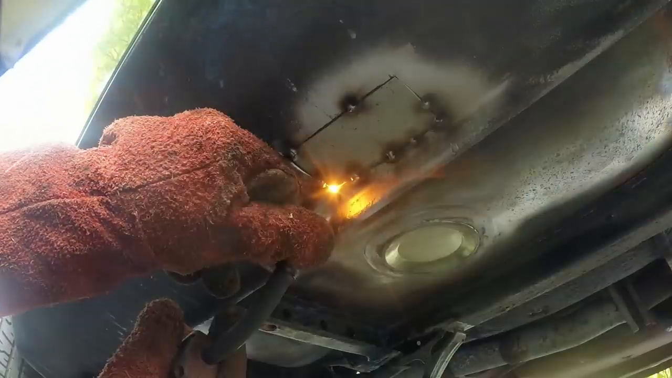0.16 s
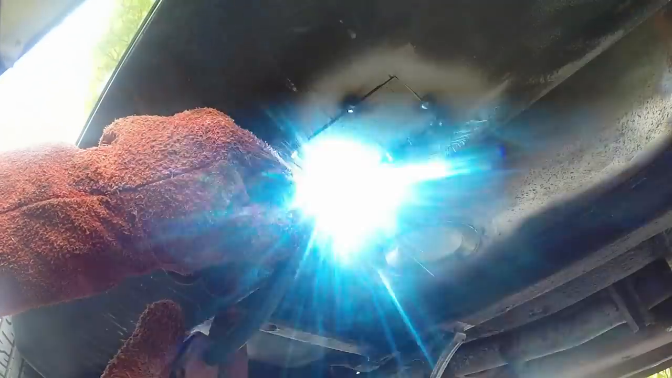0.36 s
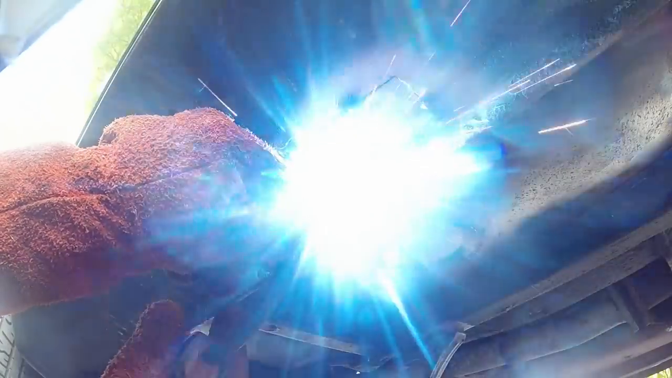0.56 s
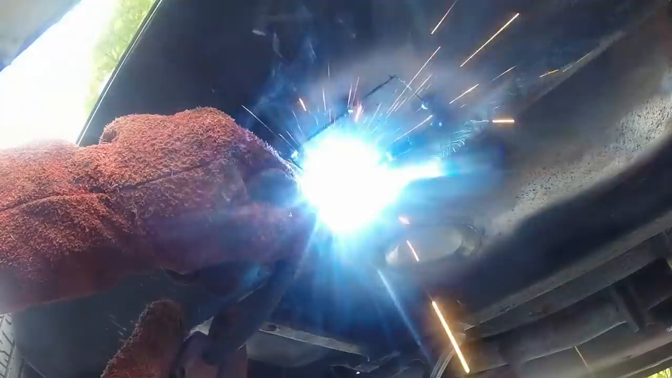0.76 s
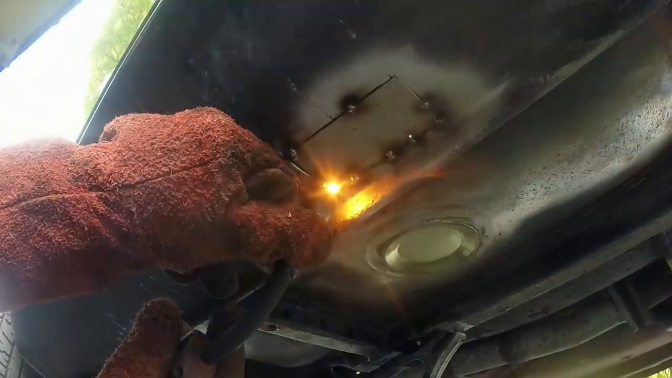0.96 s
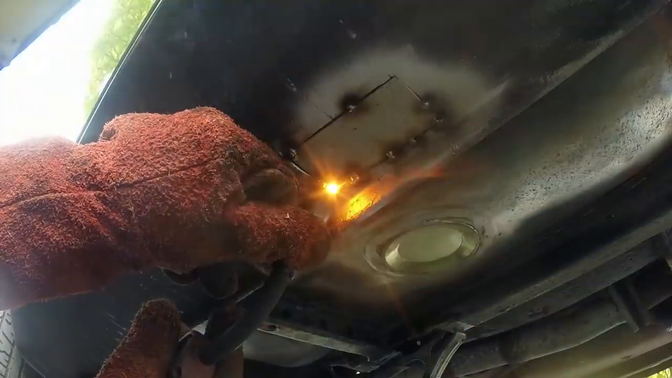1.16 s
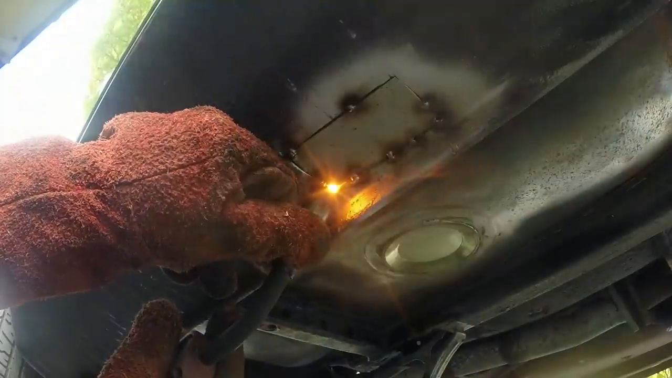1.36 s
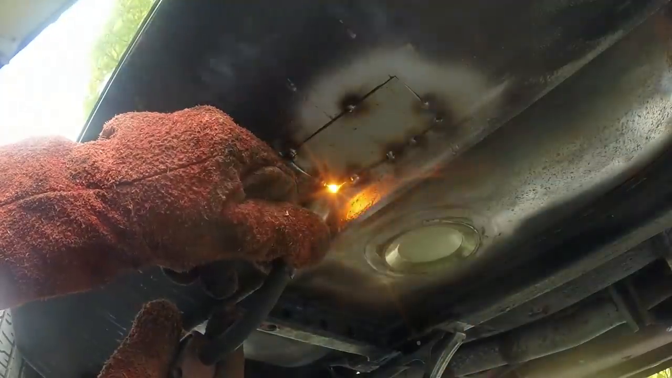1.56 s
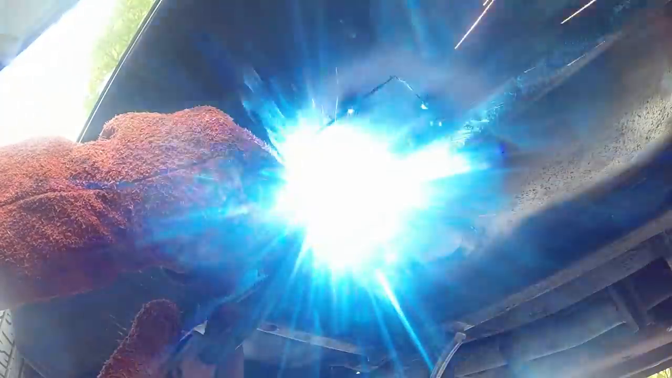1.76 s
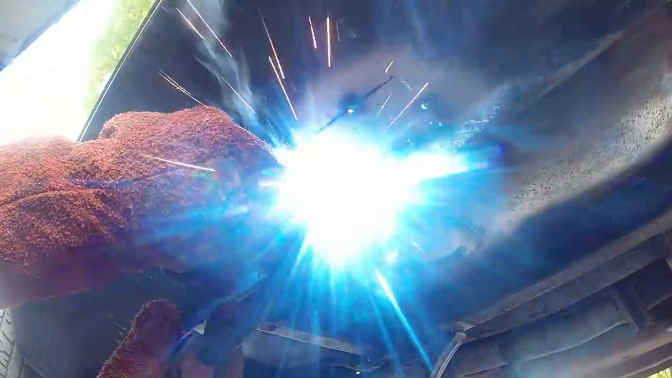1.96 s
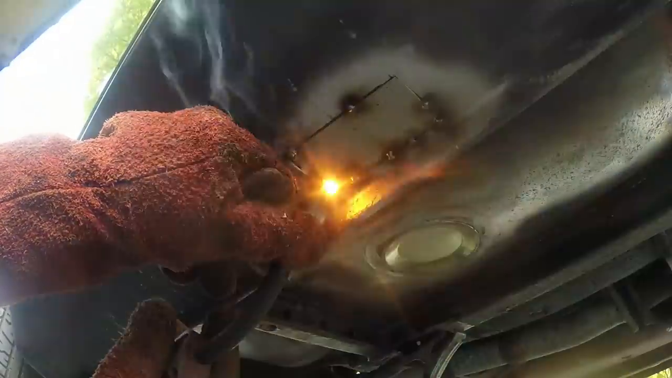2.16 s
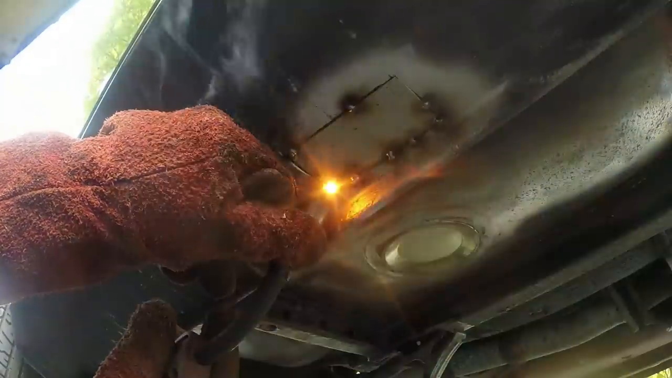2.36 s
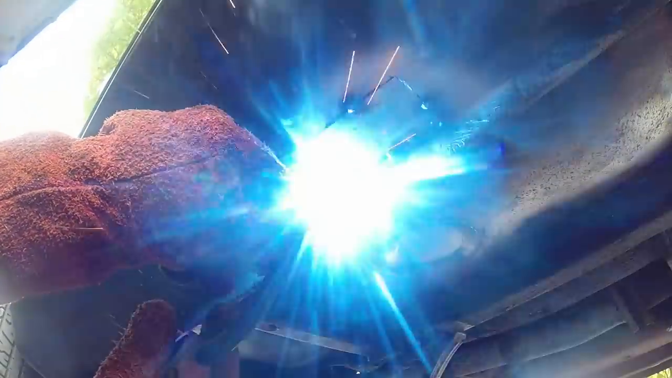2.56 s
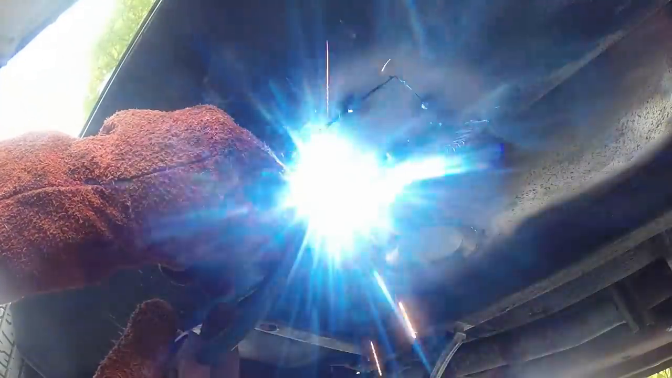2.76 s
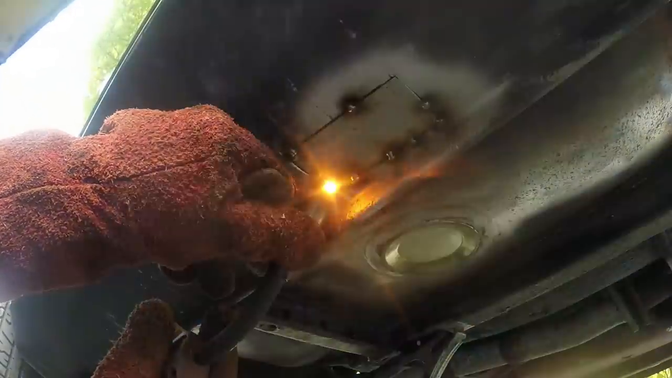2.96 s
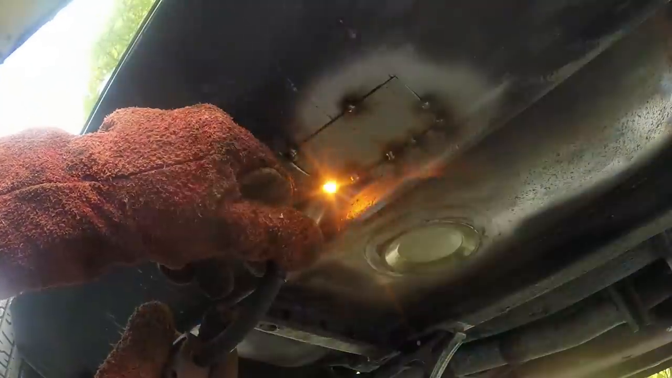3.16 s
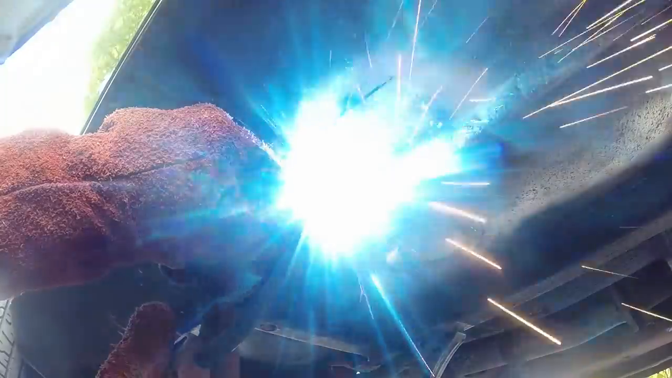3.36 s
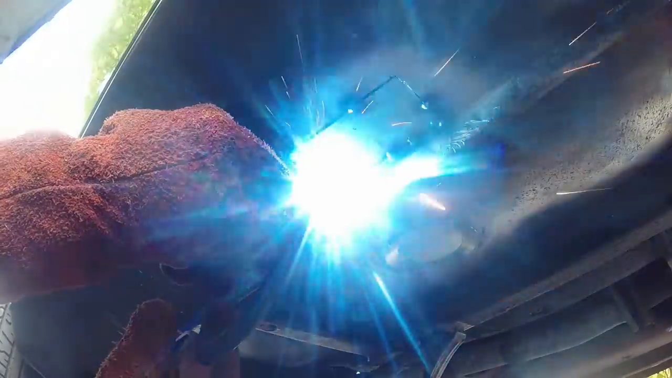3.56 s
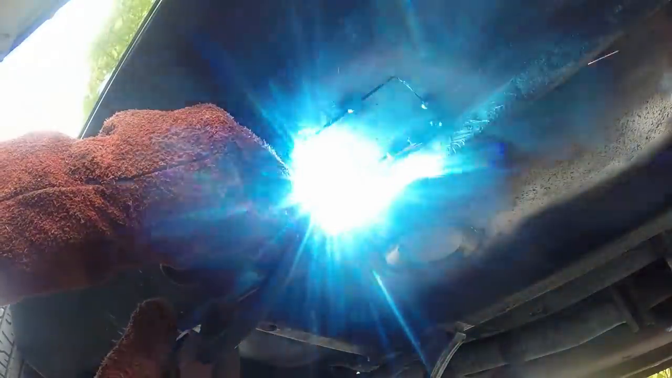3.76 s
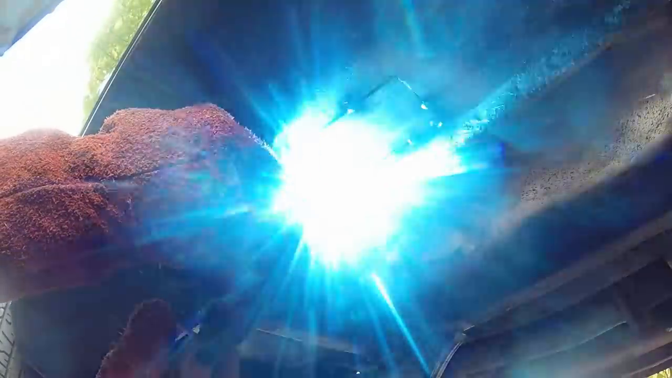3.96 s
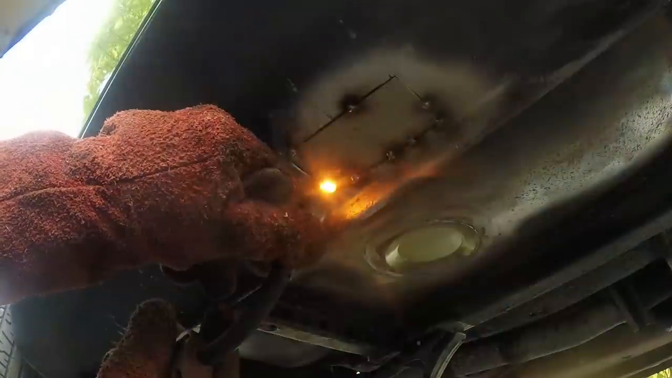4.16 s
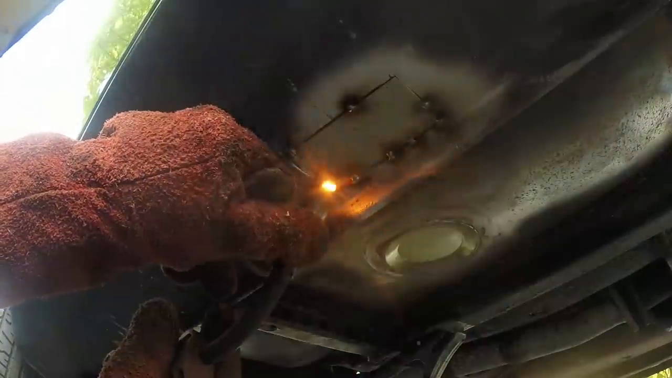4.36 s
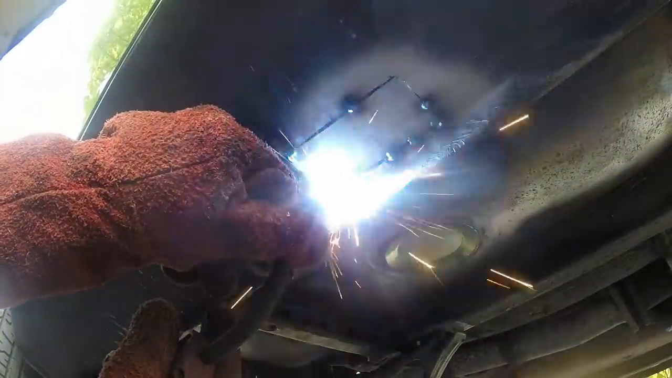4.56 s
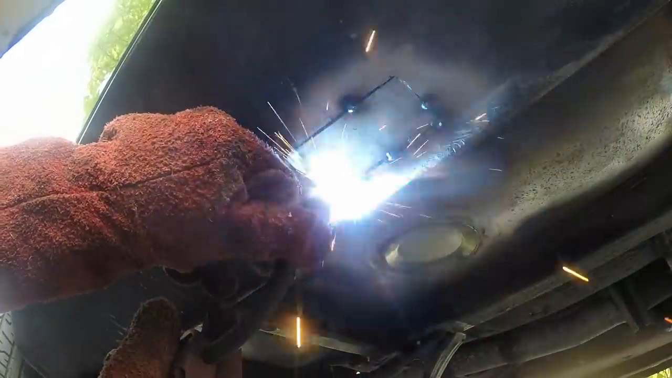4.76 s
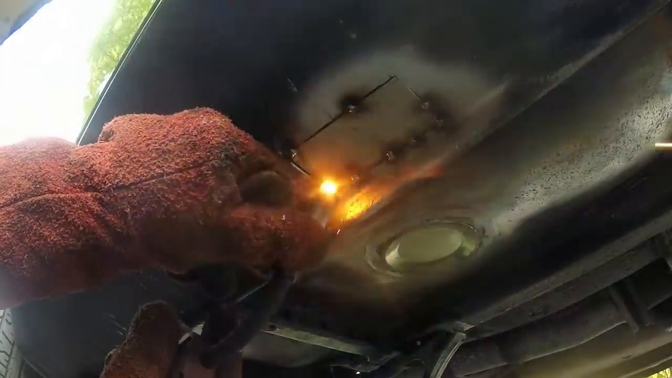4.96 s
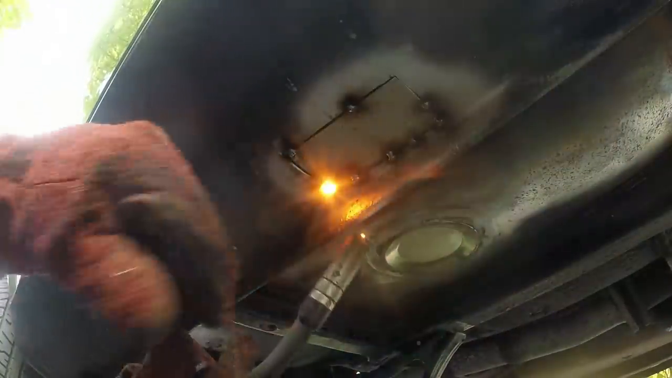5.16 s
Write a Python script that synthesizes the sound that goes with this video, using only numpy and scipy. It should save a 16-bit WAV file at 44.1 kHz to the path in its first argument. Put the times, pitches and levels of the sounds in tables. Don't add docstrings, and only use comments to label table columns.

```python
import sys
import numpy as np
from scipy import signal
from scipy.fft import rfft, irfft
from scipy.io import wavfile
from scipy.ndimage import uniform_filter1d

SR = 44100
rng = np.random.default_rng(int(sys.argv[2]) if len(sys.argv) > 2 else 0)


def transcribe(u):
    v = np.clip(np.atleast_2d(u).T, -1, 1)
    q = np.round(v * 32767).astype(np.int16)
    wavfile.write(sys.argv[1], SR, q)


def volts_from_decibels(level):
    exponent = np.asarray(level, float) / 20
    return 10 ** exponent


N = 229152
MAINS_HZ = 49.95


def level(x, db):
    return x * volts_from_decibels(db) / np.sqrt(np.mean(x ** 2))


def coloured(points):
    hz, db = np.transpose(points)
    bins_hz = np.fft.rfftfreq(N, 1 / SR)
    gain = volts_from_decibels(np.interp(np.log(bins_hz + 1), np.log(hz), db))
    white = rng.standard_normal(N)
    return level(irfft(rfft(white) * gain, N), 0)


def band(x, lo_hz, hi_hz):
    return signal.sosfilt(signal.butter(2, [lo_hz, hi_hz], "band", fs=SR, output="sos"), x)


def lift(x, hz, width_hz, db):
    return x + (volts_from_decibels(db) - 1) * signal.lfilter(*signal.iirpeak(hz, hz / width_hz, SR), x)


def walk(rate_hz):
    hold = int(SR / rate_hz)
    steps = np.repeat(rng.standard_normal(N // hold + 1), hold)
    return 1.2 * uniform_filter1d(steps, hold)[:N]


def clicks(s, size):
    out = np.zeros(N + 1)
    at = np.asarray(s) * SR
    np.add.at(out, at.astype(int), size * (1 - at % 1))
    np.add.at(out, at.astype(int) + 1, size * (at % 1))
    return out[:N]


def fading(x, seconds):
    return signal.lfilter([1], [1, -np.exp(-1 / (seconds * SR))], x)


# release_s, top_treble_db (share in that tack)
TACKS = [
    (0.174, -13),
    (0.975, -8.5),
    (2.217, -12),
    (2.938, -11.5),
    (4.096, -1.5),
    (5.032, -5),
]
TACK_MID_DB = [0, 0, -0.5, 0.5, 1.5, 2.5]


def arc():
    t = np.arange(N) / SR
    release_s, treble_db = np.transpose(TACKS)
    tack = np.minimum(np.searchsorted(release_s, t), len(release_s) - 1)
    mid_db, top_db = np.array(TACK_MID_DB)[tack], treble_db[tack]
    snaps = pops(mid_db, top_db)
    burn, fizz = sizzle(mid_db, top_db)
    diffuse = volts_from_decibels(-9) * burn * fizz[::-1]
    return underside(snaps + burn * fizz, tack, diffuse)


# start_s, pop_db, sizzle_db
RESTRIKES = [(0.0029, -1, -20), (0.02, 0, -26), (0.0301, -2.5, -12.5), (0.0439, -6.5, -16),
             (0.0507, -7.5, -20), (0.0589, -9, -35), (0.0691, 1, -22.5), (0.0891, -1.7, -22.5),
             (0.1094, 4, -25), (0.1278, -37.5, -24), (0.1485, -2, -27.5), (0.1679, -40, -27),
             (0.4812, 5.5, -23.5), (0.4982, -43, -20), (0.5091, -6, -21), (0.5297, 1.5, -22),
             (0.5517, -8.5, -36), (0.56, 0.5, -25), (0.5797, 0.5, -27.5), (0.5896, -1.5, -20),
             (0.6091, 1, -22.5), (0.6202, -6.5, -23), (0.6401, -3.5, -23.5), (0.6507, -5, -21.5),
             (0.6704, 1.1, -23.5), (0.6805, -2.5, -25), (0.6902, 6.5, -19), (0.7007, -6.5, -17.5),
             (0.7097, -3.5, -22), (0.7295, 1, -25), (0.7409, -1, -20), (0.7505, -2.5, -22),
             (0.7705, 1.5, -22.5), (0.7806, -9, -21.5), (0.791, 2, -22), (0.8048, -9, -34.8),
             (0.8112, 0.5, -28.5), (0.821, 0.5, -28), (0.832, 2.5, -22), (0.852, 1, -22.5), (0.873, -1, -21),
             (0.8936, -4.5, -22.5), (0.9129, 2.3, -25), (0.9322, -1.5, -18.5), (0.9486, -40, -23),
             (0.961, -5.5, -26),
             (1.8055, 4.5, -33), (1.8193, -40.5, -25.5), (1.8339, 6, -27), (1.852, -1, -24.5), (1.8621, 1.5, -22),
       (1.883, 2, -27), (1.899, -8.5, -26.5), (1.9231, 2.5, -25), (1.9428, 1.5, -18.5), (1.9544, -1.3, -20),
       (1.9625, -2.8, -19), (1.9726, -4.5, -21), (1.9835, -4, -18), (2.0033, -1, -20.5),
       (2.0096, -16.5, -20.5), (2.0234, 0.8, -22), (2.0338, -2.1, -19), (2.0438, -0.5, -17),
       (2.0557, 0, -19), (2.07, -17.5, -19.5), (2.0822, -1.5, -19), (2.09, -15, -19), (2.1042, 1.5, -16.5),
       (2.113, -9.5, -16.5), (2.1266, -6, -29.5), (2.1313, -5, -16.5), (2.14, -17.5, -16),
       (2.1594, -6, -23), (2.1699, -38.5, -19.5), (2.1899, -40, -19), (2.2137, -23, -18.5),
       (2.6447, 3, -35), (2.6604, -36.5, -39), (2.68, -37, -28), (2.701, -39, -17), (2.7112, 0.2, -36.5),
       (2.7304, -37, -36.5), (2.7447, -4, -28.5), (2.7544, -1, -24.5), (2.7657, -1.3, -17.5),
       (2.778, -14, -26), (2.793, -5.5, -22.5), (2.8166, -15, -17), (2.8232, -2, -24.5), (2.844, -1.5, -17),
       (2.8537, -2.5, -26), (2.8611, -13, -21.5), (2.8751, 0, -23), (2.8926, -1.1, -22.5),
       (2.911, -41, -24), (2.9355, 2.1, -37),
             (3.3045, 1.8, -38), (3.321, -38.5, -46.5), (3.3373, 3.5, -30.5), (3.3458, 4, -37),
        (3.3611, -31, -44.5), (3.3743, 1.3, -29), (3.3911, -40, -33), (3.4073, 0, -27), (3.416, -0.5, -30),
        (3.4265, -2, -32), (3.4454, 0, -30), (3.4648, -1.4, -31), (3.487, -2.5, -32), (3.4968, -3, -39),
        (3.5078, -2.5, -35), (3.5165, -2.5, -38), (3.526, -1, -33), (3.5373, -5.5, -33), (3.5501, -6, -32),
        (3.5666, -1.5, -35), (3.5854, 0.5, -35), (3.6056, -1.5, -35), (3.6265, -0.3, -34),
        (3.6474, -0.2, -37), (3.6614, -40, -32.5), (3.6774, -2.5, -31.5), (3.6865, -1.3, -32),
        (3.6954, -4, -37.5), (3.708, -3.5, -42), (3.7214, -42, -32), (3.7359, -2, -33), (3.7459, -5, -32),
        (3.7567, -4.5, -29), (3.7667, -5, -35), (3.78, -9.5, -29.5), (3.7953, -9.5, -33),
        (3.8068, -5.5, -28), (3.8175, -6, -26), (3.8267, -9.5, -28.5), (3.8347, -11, -33),
        (3.852, -40, -22), (3.866, -7, -26), (3.8777, -4.5, -30), (3.8864, -4, -33.5), (3.8958, -7, -34),
        (3.9053, -4, -26.5), (3.9203, -9, -28.5), (3.9356, -8, -33), (3.9538, -8.5, -29),
        (3.9673, -3.5, -31), (3.9753, -10, -24), (3.987, -15, -23), (4.0066, -4.1, -30.5),
        (4.0217, -40, -26), (4.0414, -40, -31), (4.0618, -40, -29.5), (4.0818, -36, -27),
             (4.5185, 3.5, -31), (4.5326, -38.5, -28), (4.5528, -37, -30), (4.5698, 2, -36.5),
        (4.5823, -40, -35), (4.5983, 2, -31), (4.607, 2, -33), (4.618, -1, -32), (4.626, -8, -27.5),
        (4.637, 0.5, -29.5), (4.6507, -6, -27.5), (4.6573, 3.5, -16), (4.671, -4, -28), (4.679, -1, -24.5),
        (4.6907, -6.5, -34), (4.6989, 1.5, -25), (4.7177, -0.5, -25.5), (4.7385, -2.5, -24.5),
        (4.758, 2.5, -25.5), (4.7775, -0.2, -28), (4.7981, -0.5, -26), (4.8157, 0, -28),
        (4.8373, -1, -21.5), (4.8449, -15, -23.5), (4.8575, 3.5, -24.5), (4.878, 2, -23),
        (4.8981, 0, -21.5), (4.9184, 11.5, -9), (4.93, -8.5, -26), (4.9378, -2.5, -22.5),
        (4.9479, -11.5, -21), (4.9595, 0, -19.5), (4.964, -9, -24.5), (4.9787, 1.4, -24),
        (4.9894, 1, -22.5), (5.0011, -3.5, -26.5), (5.0127, -40, -30.5),
             (0.072, -7, -28.5),
    (4.6097, -10, -30),
    (4.032, -41, -29.5),
    (4.0724, -41, -28),
    (4.092, -40, -30),
    (5.0227, -40, -32),
]


def restrikes():
    return np.transpose(sorted(RESTRIKES))


# start_s, level_db
TICKS = [(0.079, -16), (0.101, -26), (.129, -23), (0.161, -37), (0.168, -37), (0.722, -13), (1.737, -44),
         (1.747, -40.5), (1.758, -32.5), (1.766, -34), (5.036, -37), (5.042, -41), (4.101, -39.5),
         (1.772, -32), (1.78, -32), (1.79, -26), (1.797, -18.5), (1.825, -31.5), (3.367, -22.5),
         (3.389, -25.5), (4.105, -41), (1.287, -63.5), (4.156, -56), (4.205, -55), (4.235, -68),
         (4.546, -15), (4.595, -21), (4.631, -20)]
# start_s, pop_db
NECKS = [(.0278, -6), (.0459, -10), (.5212, -20), (.5385, -7), (.5635, -0.5), (.7643, -21), (.9597, -9.5),
         (1.843, -13), (2.0671, -10), (2.1672, -17), (2.1904, -15), (2.7076, -16), (2.7752, -16),
         (3.4747, -13.5), (3.4785, -4), (3.4851, -12), (3.5062, -9), (3.5352, -13), (3.5466, -5),
         (3.706, -16), (3.7774, -10), (3.8164, -9), (3.8715, -13), (3.918, -6.5), (4.155, -40),
         (4.2055, -52), (4.5266, -10), (4.7118, -8), (4.7214, -9), (4.7312, -8), (4.7807, -16), (4.791, -9),
         (4.8116, -16), (4.831, -10), (4.841, -12), (4.8712, -8), (4.9104, -11), (4.9995, -16)]


def pops(mid_db, top_db):
    s, pop_db, _ = restrikes()
    tick_s, tick_db = np.transpose(TICKS)
    neck_s, neck_db = np.transpose(NECKS)
    necks = clicks(neck_s, volts_from_decibels(neck_db + 2.5))
    strikes = clicks(s, volts_from_decibels(pop_db + 5.0)) + necks
    crack = fading(strikes, 0.00074) * rng.standard_normal(N) * volts_from_decibels(-20.0)
    ticks = uniform_filter1d(fading(clicks(tick_s, volts_from_decibels(tick_db + 2.0)), 0.001), size=50)
    crack += ticks * rng.standard_normal(N)
    thump = band(strikes, 52, 330) * volts_from_decibels(-3.0)
    punch = band(strikes, 190, 430) * volts_from_decibels(-9)
    colour_db = 1.5 * rng.standard_normal((len(s), len(HOLLOW)))
    sizes = volts_from_decibels(pop_db[:, None] + 4.5 + colour_db)
    drives = []
    for size in sizes.T:
        suction = np.convolve(clicks(s, size) + necks, [.24, .52, .24], "same")
        drives.append(crack - suction)
    return hollow(drives, column=2, mid_db=mid_db, top_db=top_db) - (thump + punch)


# from_s, to_s
STALLS = [
    (0.06, 0.066),
    (2.698, 2.7025),
    (4.556, 4.569),
]


def sizzle(mid_db, top_db):
    t = np.arange(N) / SR
    s, pop_db, burn_db = restrikes()
    last = np.maximum(np.searchsorted(s, t) - 1, 0)
    release_s = np.array(TACKS)[:, 0]
    lit = np.searchsorted(release_s, s[last]) == np.searchsorted(release_s, t)
    lit = lit & ~np.any([(t > a) & (t < b) for a, b in STALLS], axis=0)
    before_pop = fading(clicks(s, 1. * (pop_db > -25))[::-1], 0.0012)[::-1]
    shorted = np.clip(uniform_filter1d(before_pop, 20), 0, 1)
    crest = 0.28
    ripple_db = 4.17 * np.cos(2 * np.pi * (2 * MAINS_HZ * t - crest))
    flicker_db = 1.8 * walk(260)
    burn = lit * volts_from_decibels(burn_db[last] + ripple_db + flicker_db - 31 * shorted)
    burn = uniform_filter1d(burn, size=40)
    drives = [rng.standard_normal(N)] * len(HOLLOW)
    fizz = level(hollow(drives, column=3, mid_db=mid_db, top_db=top_db), -5.0)
    return burn, fizz


# pitch_hz, width_hz, pop_db, sizzle_db
HOLLOW = [(497, 130, -5, -25), (720, 300, 1, -41.5), (1145, 427, -2, -13), (1524, 220, -2.5, -8),
          (2390, 860, -3, -23.5), (3203, 720, 7, 1), (4300, 290, 4, 0), (6200, 2000, 4.5, 2),
          (8400, 1600, -21.5, -13), (8420, 1600, 0.5, -7.5), (11460, 1300, -11.5, 5.5),
          (12000, 1400, 7.5, -7), (13550, 1000, 6, 1)]


def hollow(drives, column, mid_db, top_db):
    rings = []
    for row, x in zip(HOLLOW, drives):
        ring = signal.lfilter(*signal.iirpeak(row[0], row[0] / row[1], SR), x)
        rings.append(volts_from_decibels(row[column]) * ring)
    fixed = sum(rings[:2] + rings[4:8])
    return fixed + volts_from_decibels(mid_db) * sum(rings[2:4]) + volts_from_decibels(top_db) * sum(rings[8:])


# delay_ms, gain (ratio)
PANELS = [(.25, -.75), (.445, -.95), (1.14, .45), (1.5, -.15)]
# pitch_hz, width_hz, level_db
HOUSING = [(2300, 180, -0.5), (3570, 370, 0.5), (5330, 300, -3.5), (5660, 170, 3.5), (6050, 120, -0.5)]
# pitch_hz, width_hz, level_db
TOP_DIP = (14450, 800, -8)
# pitch_hz, width_hz, level_db for each tack
SHEEN = [(8000, 1100, [6, 3, 0, 2.5, -1.5, -1]), (12180, 900, [0, -1, -5, 1, -5, -2.5]),
         (13300, 800, [0, -4.5, 3, 5, 0, 0.5]), (15450, 900, [11, 3, 9, 9, 7, 9])]


def underside(x, tack, diffuse):
    t = np.arange(SR // 4) / SR
    scatter = volts_from_decibels(-28.5 - 60 * t / .03)
    shop = volts_from_decibels(-35.5 - 60 * t / 0.088)
    tail = scatter + shop
    rough = rng.standard_normal(len(t))
    delay_ms, gain = np.transpose(PANELS)
    panels = np.convolve(clicks(delay_ms / 1000, gain)[:len(t)], [.25, .5, .25], "same")
    out = .75 * x + diffuse
    for k in range(len(TACKS)):
        grain = np.roll(rough, k * len(t) // len(TACKS))
        echo = tail * grain * (t > .0012) + panels
        out = out + signal.fftconvolve(x * (tack == k), echo)[:N]
    for hz, width_hz, db in HOUSING + [TOP_DIP]:
        out = lift(out, hz, width_hz, db)
    late_tack = np.roll(tack, SR // 10)
    for hz, width_hz, db in SHEEN:
        out = lift(out, hz, width_hz, np.array(db)[late_tack])
    return out


# start_s, puff_db, jet_db
TRIGGERS = [
    (0.191, -91, -67.5),
    (.272, -67, -66.5),
    (1.416, -35, -57),
    (2.444, -35.5, -56),
    (3.084, -39, -61.5),
    (4.335, -35, -57.5),
]
# pitch_hz, level_db (per Hz)
JET = [(3500, -46), (4200, -22.5), (5200, -23), (5750, -3.5), (6250, -4.5), (7000, -13), (8000, -22.5),
       (9500, -36)]
# pitch_hz, level_db (per Hz)
JET_BODY = [(500, -34), (800, -7), (1500, -6.5), (2000, 1.5), (2400, -3.5), (3500, -4), (4200, -22.5),
            (6000, -29.5)]


def gas():
    t = np.arange(N) / SR
    release_s = np.array(TACKS)[:, 0]
    rise_s, fall_s, close_s, swell_db_per_s = 0.0049, 0.018, 0.011, 12.5
    puff, jet = 0, 0
    for s, puff_db, jet_db in TRIGGERS:
        rise = np.exp(np.minimum(t - s, 0) / rise_s)
        puff = puff + volts_from_decibels(puff_db) * rise * np.exp(-np.maximum(t - s, 0) / fall_s)
        shut = release_s[release_s > s][0]
        swell_db = swell_db_per_s * np.clip(t - s, 0, shut - s)
        jet = jet + volts_from_decibels(jet_db + swell_db) * rise * np.exp(-np.maximum(t - shut, 0) / close_s)
    top = level(band(rng.standard_normal(N), 8500, 14000), .3)
    jet_top = lift(band(top, 7500, 12500), 11300, 500, 5.0)
    body = puff * volts_from_decibels(-5.5) + jet * volts_from_decibels(-3)
    bright = puff * volts_from_decibels(-8.5) * top + jet * volts_from_decibels(-13) * jet_top
    flow = (puff + jet) * coloured(JET) + body * coloured(JET_BODY) + bright
    seep = volts_from_decibels(-79.5) * band(rng.standard_normal(N), 2000, 9000)
    return volts_from_decibels(1.0 * walk(40)) * flow + seep


# start_s, level_db, pitch_hz
KNOCKS = [(0.106, -24, 119), (0.48, -15, 200), (0.558, -21.5, 147.4), (0.828, -30, 196), (1.793, -27, 220),
          (1.95, -32, 208), (2.846, -40, 211), (3.342, -54, 398), (3.442, -26, 148.4), (3.899, -29, 212),
          (4.52, -14.5, 180), (4.631, -16, 51.1), (4.898, -24.5, 139), (4.976, -26, 203)]


def knocks():
    t = np.arange(N) / SR - .003
    out = 0
    for s, db, hz in KNOCKS:
        decay = (t > s) * np.exp(-np.abs(t - s) / 0.00088)
        out = out + volts_from_decibels(db + 6.0) * decay * np.sin(2 * np.pi * hz * (t - s))
    return out


# start_s, length_s, level_db,
# pitch_hz
GROANS = [
    (1.492, 0.049, -45, 246),
    (1.648, 0.085, -43, 347),
    (1.666, 0.05, -38.5, 286),
    (1.665, .055, -35.5, 168),
    (1.702, 0.032, -46, 260),
    (1.713, .05, -37, 80),
    (1.754, .05, -38, 76),
    (4.009, 0.038, -27, 877),
    (4.272, .018, -67, 5400),
]


def groans():
    t = np.arange(N) / SR
    out = 0
    for s, length, db, hz in GROANS:
        u = np.clip((t - s) / length, 0, 1)
        sag = 0.31 * min(200 / hz, 1)
        swell = np.sin(np.pi * u) ** 2
        out = out + volts_from_decibels(db) * swell * np.sin(2 * np.pi * hz * length * (u - sag * u ** 2 / 2))
    return out


AFTERGLOW_DB = [-69, -83.5, -73, -79, -69, -71]


def afterglow():
    t = np.arange(N) / SR
    fade = 0
    for (end, _), db in zip(TACKS, AFTERGLOW_DB):
        fade = fade + volts_from_decibels(db) * (t > end) * np.exp(-np.abs(t - end) / 0.23)
    hiss = level(band(rng.standard_normal(N), 1500, 12000), 0)
    return fade * volts_from_decibels(1.5 * walk(30)) * hiss


STRIKES_S = [
    0,
    .481,
    1.805,
    2.645,
    3.305,
    4.519,
]


def by_state(idle_db, feed_db, arc_db):
    t = np.arange(N) / SR
    release_s = np.array(TACKS)[:, 0]

    def within(starts):
        return np.any([(t > s) & (t < release_s[release_s > s][0]) for s in starts], axis=0)

    feeding = within(np.array(TRIGGERS)[2:, 0])
    db = np.where(feeding, feed_db, 1. * idle_db)
    return uniform_filter1d(np.where(within(STRIKES_S), arc_db, db), size=2000)


# pitch_hz, level_db (per Hz)
SHOP = [(25, -11.5), (80, -15), (200, -6.5), (340, -14), (420, -19), (700, -20), (1200, -25), (4000, -41),
        (16000, -63.5)]
# harmonic (multiple of mains), level_db
HUM = [(1, -15.5), (2, -3), (3, -10), (4, -11.5), (6, -14)]
# start_s, level_db
BUSTLE = [(0, 1.5), (.4, -4), (.75, 5), (1.05, -5.5), (1.25, -3), (1.4, 1.5), (1.6, 0.5), (1.7, 5.5),
          (1.85, 2), (2.3, -1.5), (2.6, 3), (3.1, 2.5), (3.7, 2), (4.08, -3), (4.2, -1.5), (4.45, -1.5),
          (5.0, 2), (5.2, -1)]


def workshop():
    t = np.arange(N) / SR
    bustle_db = np.interp(t, *np.transpose(BUSTLE))
    rumble_db = by_state(idle_db=-54, feed_db=-50.5, arc_db=-48.5) + bustle_db
    rumble_db = rumble_db + 2.0 * walk(25) + 0.31 * walk(4.5)
    hum = 0
    for k, db in HUM:
        waver = volts_from_decibels(db + 1.2 * walk(4.8))
        hum = hum + waver * np.sin(2 * np.pi * k * (MAINS_HZ * t + rng.random()))
    hum_db = by_state(idle_db=-48.5, feed_db=-49.5, arc_db=-60.5) + bustle_db / 2
    return volts_from_decibels(rumble_db) * coloured(SHOP) + volts_from_decibels(hum_db) * hum


def drone():
    t = np.arange(N) / SR
    on_s, off_s, fade_s = 1.23, 3.35, 0.089
    on = np.clip(np.minimum(t - on_s, off_s - t) / fade_s, 0, 1)
    loudness = volts_from_decibels(-49 - 3.5 + 4.4 * walk(14))
    pitch_hz = 70.7 * (1 + 0.056 * walk(12))
    return on * loudness * np.sin(2 * np.pi * np.cumsum(pitch_hz) / SR)


def scene():
    near = arc() + gas() + knocks()
    floor = workshop() + drone() + groans() + afterglow()
    no_top = signal.ellip(6, .5, 40, 12900, fs=SR, output="sos")
    return (near + signal.sosfilt(no_top, floor))[None]


EDGES_HZ = [15400, 15900, 16700]
HARD_S = [
    .481,
    1.805,
    3.305,
    3.34,
    3.375,
    3.406,
    4.519,
    4.57,
]


def top_bands(x):
    size = 1024
    hz = np.fft.rfftfreq(2 * N, 1 / SR)
    lines = rfft(x, 2 * N)
    under = [np.sin(np.pi / 2 * np.clip((edge - hz) / 160 + .5, 0, 1)) ** 2 for edge in EDGES_HZ]
    low, upper, topmost = (irfft(lines * (a - b))[:N] for a, b in zip(under, [0] + under))
    strong = uniform_filter1d(upper ** 2, size) > volts_from_decibels(-61) ** 2
    hard = np.any([np.abs(np.arange(N) / SR - s) < .007 for s in HARD_S], axis=0)
    strong_gate, hard_gate = (uniform_filter1d(1. * gate, size // 3) for gate in (strong, hard))
    return low + volts_from_decibels(-8) * strong_gate * upper + volts_from_decibels(-8) * hard_gate * topmost


# centre_s, lost (share), one_khz, other_khz (surviving bands)
STARVED = [(.04, .85, 7.8, 13.4), (.338, .84, .2, .2), (.423, .8, .2, .2), (.6995, .97, 11.3, 11.3),
           (1.51, .84, .2, .2), (2.153, .85, 3.5, 13.5), (2.535, .88, .2, .2), (3.857, .75, 3.3, 13.5),
           (3.988, .65, 9.8, 13.5), (4.03, .78, .85, 13.5), (4.538, .995, 10.8, 13.8),
           (4.667, .85, 1.6, 1.6), (4.924, .93, 1, 1.6)]
STARVED_DB = [3.5, 4, 4, 7, 7, 3, -1, 2.5, 8, 1.5, 10, 6.5, 0]
ARC_KHZ = [3.1, 3.55, 5.8, 6.2]
GAS_KHZ = [1, 1.9, 3.6, 5.85, 6.2]


def starve(x):
    out, size = x.copy(), 1880
    window = np.sin(np.pi * np.arange(size) / size) ** 1.3
    khz = np.fft.rfftfreq(size, 1000 / SR)
    for (s, lost, one, other), step_db in zip(STARVED, STARVED_DB):
        quiet = one < .4
        kept_khz = [one, other] + (GAS_KHZ if quiet else ARC_KHZ[2 * (lost > .99):])
        frame = slice(int(s * SR) - size // 2, int(s * SR) + size // 2)
        lines = rfft(x[frame] * window)
        bass = (khz < .4) & quiet
        near = [np.abs(khz - k) < .015 + .025 * k * (k < 7) + .04 * (k > 7) for k in kept_khz]
        kept = np.any(near, axis=0) & ~bass
        kept = kept & ((rng.random(len(khz)) < .5) | (khz < 2))
        peak = uniform_filter1d(np.abs(lines), size=30)[khz > 1].max()
        step = peak * volts_from_decibels(step_db + 2.5 - .25 * khz)
        phase = np.exp(2j * np.pi * rng.random(len(khz)))
        smeared = kept * step * np.where(khz < .9, 2, 1) * phase
        dip = lost * np.clip(1.3 * window ** (5 if quiet else 3), 0, 1)
        out[frame] += window * irfft(smeared) - dip * irfft(rfft(x[frame]) * ~bass)
    return out


def low_pass(x):
    return signal.sosfilt(signal.butter(12, 16710, fs=SR, output="sos"), x)


def record(dry):
    rounded = 1.3 * np.tanh(dry[0] / 1.3)
    top = signal.ellip(3, 1, 16, 14500, fs=SR, output="sos")
    camera = top_bands(signal.sosfilt(top, rounded))
    mix = starve(camera)[None]
    return low_pass(mix)


dry = scene()
out = record(dry)
transcribe(out)
```